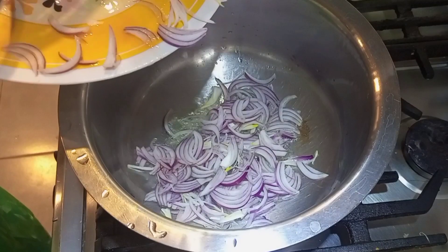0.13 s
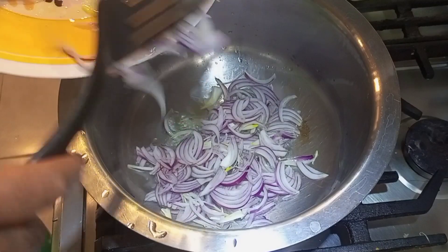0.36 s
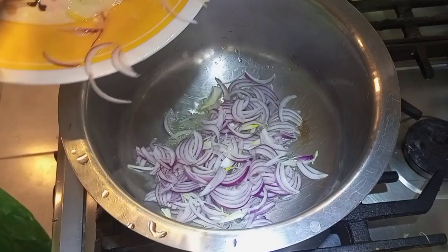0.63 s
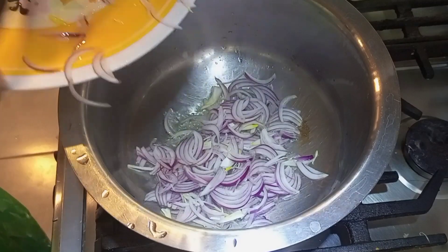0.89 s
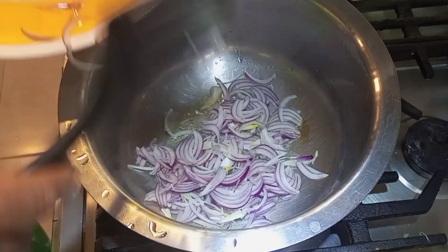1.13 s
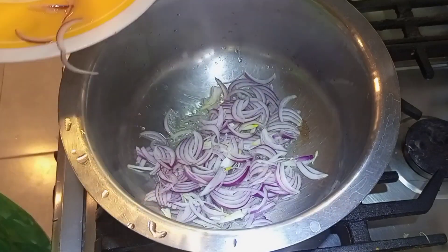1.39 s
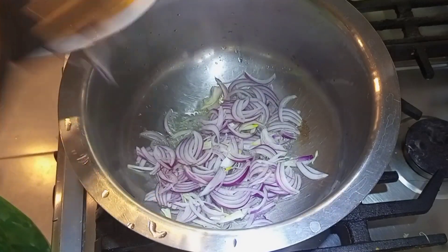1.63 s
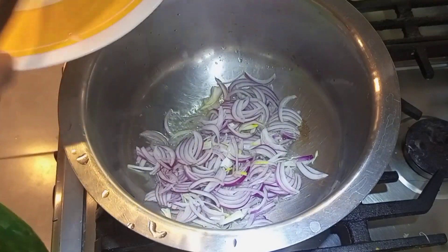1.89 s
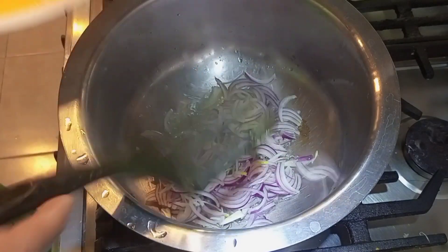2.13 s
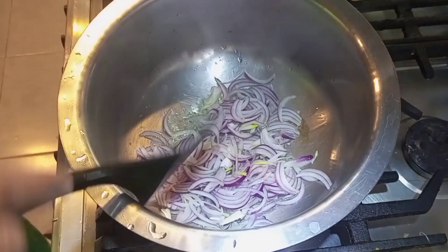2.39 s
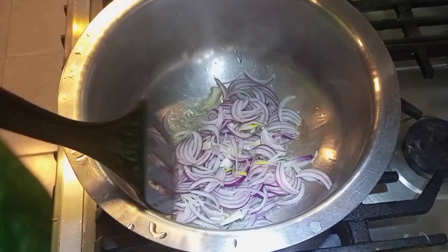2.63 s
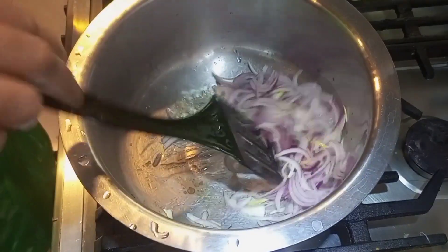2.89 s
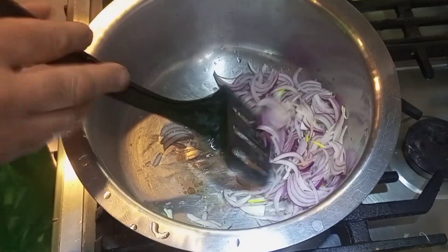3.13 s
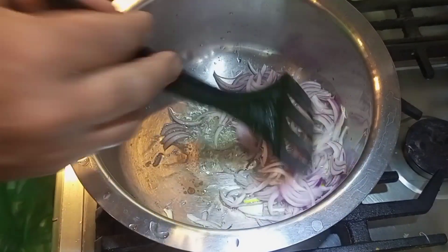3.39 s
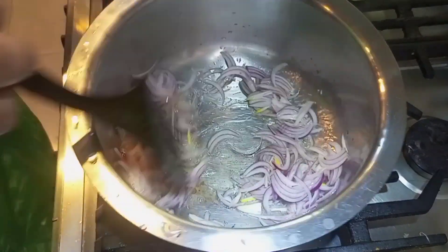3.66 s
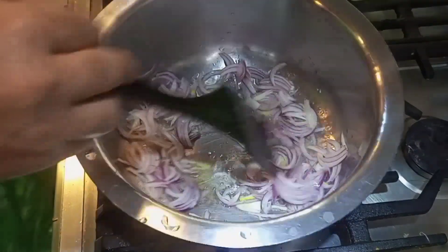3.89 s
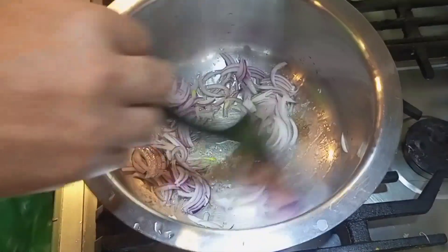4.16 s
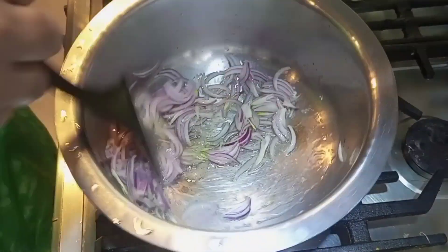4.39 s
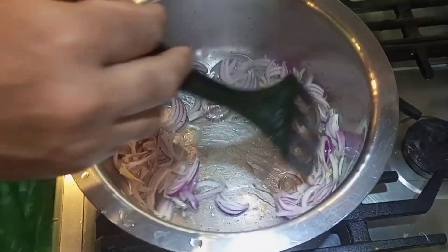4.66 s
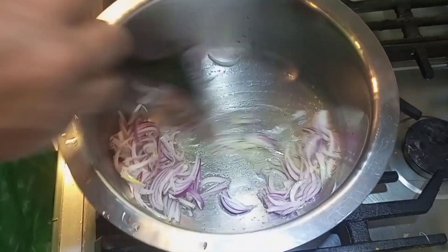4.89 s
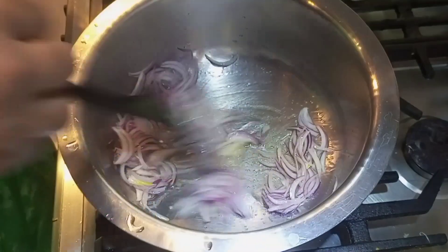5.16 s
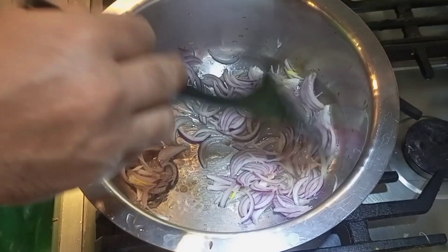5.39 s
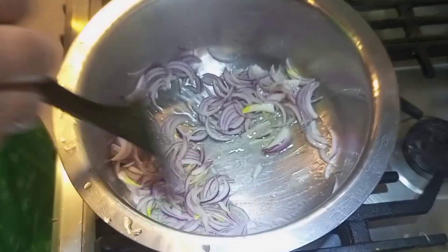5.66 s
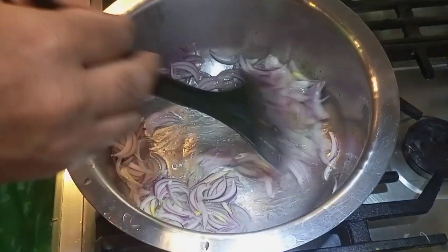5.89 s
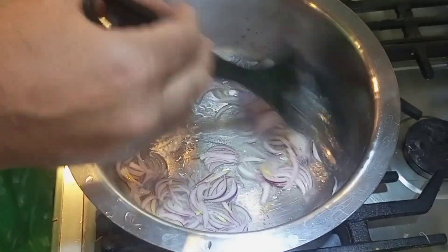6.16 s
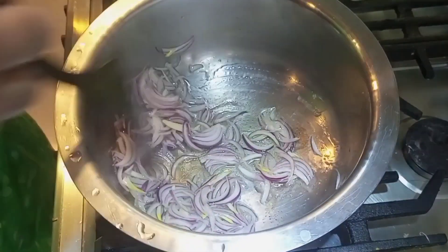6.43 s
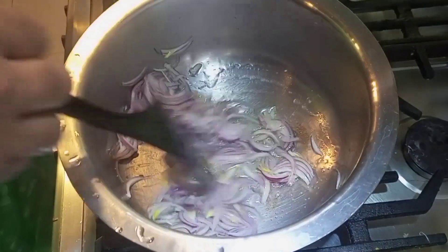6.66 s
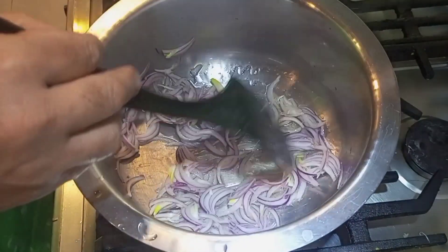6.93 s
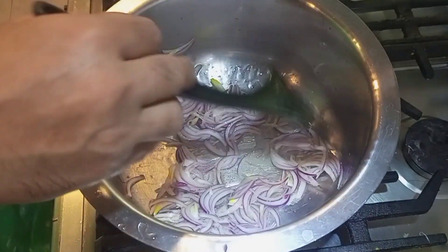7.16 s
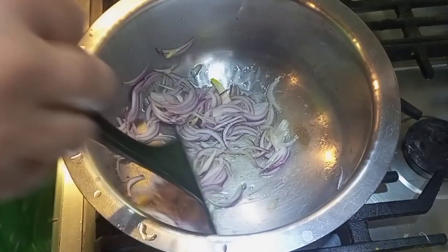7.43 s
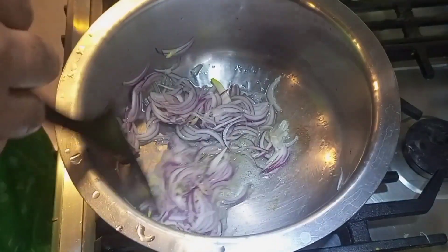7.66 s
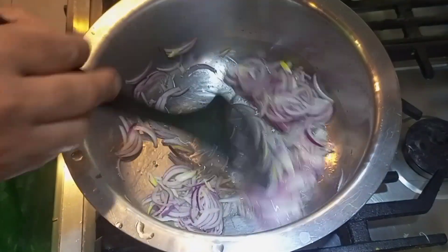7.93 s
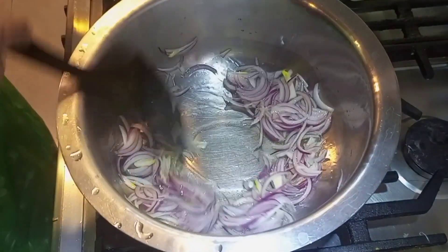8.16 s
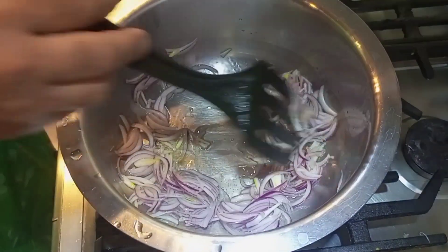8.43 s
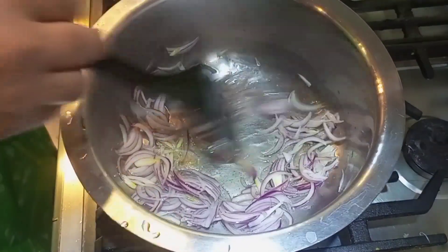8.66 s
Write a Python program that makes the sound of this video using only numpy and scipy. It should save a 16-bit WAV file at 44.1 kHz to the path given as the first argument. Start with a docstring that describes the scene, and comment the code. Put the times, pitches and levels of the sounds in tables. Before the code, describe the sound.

Over a low fan hum, three knocks on a plate and a ringing pot clank lead into spatula strokes through onions frying with swelling sizzle.

```python
"""A small tiled kitchen: sliced onions sizzle and spit in hot oil in a steel pot, under an extractor fan's hum.
A plastic spatula knocks three times on a plate, with one faint tap between, and clanks on the pot's rim.
Then it stirs: it rumbles over the bottom and makes the steel walls sing. Fan and frying are sines and shaped
noise; spits and blows are fading sines and noise bursts; knocks and strokes are shocks through resonances.
The room answers with noise that dies at its own speed in each band; one microphone hears it all."""
import sys
import numpy as np
from scipy import signal
from scipy.fft import rfft, irfft, next_fast_len
from scipy.io import wavfile
from scipy.ndimage import uniform_filter1d, minimum_filter1d, map_coordinates

SR = 44100
rng = np.random.default_rng(int(sys.argv[2]) if len(sys.argv) > 2 else 0)


def level_to_linear(level):
    """Convert decibel levels to linear amplitude factors, elementwise."""
    exponent = np.asarray(level, float) / 20
    return 10 ** exponent


def wav_record(signal):
    """Record a signal, one row per channel, as 16-bit PCM in the file named by sys.argv[1]."""
    frames = np.transpose(np.atleast_2d(signal))
    bounded = np.clip(frames, -1, 1)
    # unit amplitude maps onto the largest positive 16-bit level
    quanta = np.round(bounded * 32767).astype(np.int16)
    wavfile.write(sys.argv[1], SR, quanta)


N = 388080
HZ = np.fft.rfftfreq(next_fast_len(N + SR), 1 / SR)  # grid for whole-scene filters, a second of room for tails

# fan blade tones before their unsteadiness: (frequency [Hz], rms level [dB])
FAN_TONES = [(91.5, -67), (183.0, -65.5), (274.5, -81.5), (366.1, -83.5)]
# spectrum of the fan's air noise: (frequency [Hz], relative density [dB per Hz])
AIR_COLOUR = [(15, -64), (55, -21), (82, -3), (134, -6), (182, -15), (236, -16.5), (277, -12.5),
              (939, -13.5), (3000, -31), (3900, -66), (6600, -120)]
# fizz before its flutter, and coarse crackle, which also carries the rattle after the clank:
# (time [s], fizz level [dB], coarse crackle level [dB])
FIZZ_AND_CRACKLE = [(0, -57.5, -77.5), (.55, -57, -65), (1.6, -61, -65), (2.17, -61, -67.5),
                    (2.35, -59, -49), (2.7, -63, -62.5), (3.05, -55, -59.5), (3.7, -49.5, -54),
                    (4.75, -48.5, -64.5), (5.1, -54, -66.5), (5.4, -52, -67), (5.85, -47, -54.5),
                    (6.35, -51.5, -63), (7.0, -52.5, -75), (7.9, -58, -64.5), (8.3, -52, -60),
                    (8.8, -55, -67)]
# spectrum of the fizz: (frequency [Hz], relative density [dB per Hz])
FIZZ_COLOUR = [(1500, -12.5), (2500, -7), (4000, -2.5), (6500, 3), (9200, 6.5), (10500, 2.5), (11200, -5),
               (13500, -9.5), (14300, -3), (15500, 5), (15750, -35)]
# modes of the steel pot, ringing freely: (frequency [Hz], level [dB], t60 [s])
POT_MODES = [(372, -11, .9), (554, -7, .28), (889, -12.5, 1.2), (1151, -12, 2.4), (1169, -18, 3.5),
             (1252, -19, 2.0), (1880, -16, .4), (2004, -3, .35), (2112, -12, .35), (2170, -9, .35),
             (2349, -6, .85), (2380, -6, .7), (2607, -9, .5), (2810, -14, .5), (4150, -11, .25),
             (4871, -6, .25), (4987, -2, .28), (5834, -10, .2), (6445, -7, .18), (6561, -1, .23)]
# resonances of the pot's bottom under the spatula: (frequency [Hz], width [Hz], level [dB])
BOTTOM_RESONANCES = [(278, 24, 1), (378.3, 7.2, 3.5), (491, 76, 2), (848, 108, 1), (1308, 85, -4.5),
                     (1715, 25, 2), (2120, 30, -7.5), (2570, 63, -3.5), (2955, 40, -8)]
# strokes over the bottom: (time [s], length [s], scrape level [dB], scrape centre [Hz], rumble level [dB])
STROKES = [(2.238, 0.3, -55, 1010, -50.5), (2.422, 0.1, -46, 2710, -84), (2.882, 0.14, -53, 3530, -62),
           (3.567, 0.078, -58, 2700, -72), (3.748, 0.17, -49.5, 970, -48.5),
           (3.985, 0.13, -55.5, 800, -49.5), (4.119, 0.2, -56.5, 740, -58), (4.324, 0.14, -54, 1050, -51.5),
           (4.495, 0.074, -58, 800, -67), (4.942, 0.21, -63, 1000, -59), (5.656, 0.23, -56, 1080, -52),
           (5.865, 0.084, -55.5, 4740, -86), (6.27, 0.12, -65.5, 1010, -80), (6.745, 0.17, -63.5, 850, -55),
           (7.848, 0.14, -63, 855, -65.5), (8.158, 0.049, -58, 1930, -85),
           (8.753, 0.098, -58.5, 1000, -61.5)]
# short narrow bands of hiss that open and fade: (time [s], length [s], level [dB], centre [Hz])
NARROW_BANDS = [(0.549, 0.027, -55.5, 6200), (1.043, 0.084, -60, 5380), (1.669, 0.11, -59.5, 4950),
                (2.023, 0.0174, -47, 4460), (2.427, 0.047, -45.5, 4490), (2.62, 0.051, -54, 4580),
                (2.669, 0.16, -60.5, 386), (2.899, 0.24, -57, 5850), (3.2, 0.15, -60, 5700),
                (3.3, 0.038, -56.5, 1966), (3.326, 0.14, -58.5, 4870), (3.485, 0.04, -53, 5400),
                (3.606, 0.037, -51, 5500), (3.63, 0.094, -60, 2830), (3.745, 0.069, -60, 2120),
                (3.992, 0.051, -61.5, 1380), (4.108, 0.054, -58, 1360), (4.332, 0.082, -61, 2120),
                (4.373, 0.1, -59, 800), (4.565, 0.064, -51.5, 5900), (4.894, 0.016, -55.5, 2400),
                (5.064, 0.055, -67, 2120), (5.063, 0.029, -69, 1310), (5.423, 0.034, -53.5, 5840),
                (5.442, 0.046, -69.5, 1660), (5.664, 0.039, -63, 1715), (5.698, 0.14, -52.5, 5940),
                (6.805, 0.11, -69, 1370), (6.057, 0.07, -60, 4930), (6.325, 0.071, -67.5, 795),
                (7.869, 0.05, -77, 1715), (7.962, 0.053, -67.5, 1715), (8.33, 0.045, -65.5, 1715),
                (8.059, 0.034, -60.5, 6500), (8.154, 0.14, -62.5, 4620), (8.166, 0.085, -64, 1150),
                (8.242, 0.095, -56, 5980), (8.42, 0.037, -52, 5800)]
# decay of the kitchen's answer: (frequency [Hz], t60 [s])
KITCHEN_DECAY = [(300, 0.84), (620, 0.25), (1000, 0.44), (4000, 0.35), (10000, 0.11)]
# knocks on the plate; a harder contact has a higher centre: (time [s], force [dB], centre [Hz])
KNOCKS = [(0.7952, 2.5, 840), (1.4828, 7, 1100), (1.583, -15, 3470), (1.9333, 3, 2480)]
# resonances of the plate: (frequency [Hz], width [Hz], level [dB])
PLATE_RESONANCES = [(620.6, 8, 11.5), (724, 244, 6.5), (961, 19, 3.5), (1440, 900, -4.5), (1715, 9.7, -1),
                    (2600, 100, 2.5), (3026, 74, 4.5), (3570, 580, 0.5), (4850, 9800, -7.5),
                    (6020, 120, 11)]
# spitting drops: (time [s], level before ring/click mix [dB], pitch [Hz])
SPITS = [(1.3329, -39.5, 4700), (1.399, -42, 8300), (1.671, -32, 6050), (1.826, -40.5, 8150),
         (1.9007, -38.5, 6300), (2.195, -41, 5860), (2.368, -36, 7400), (2.4512, -33, 4700),
         (2.5004, -18.5, 14000), (2.786, -40, 2650), (2.8504, -24.5, 4360), (2.894, -27, 6270),
         (3.314, -33, 7440), (3.492, -29.5, 6160), (3.704, -35, 6250), (3.9477, -28, 7100),
         (4.1036, -28, 9100), (5.8102, -35, 8930), (5.9528, -28, 6150), (8.0594, -40, 6740),
         (8.4486, -41, 5590)]
# blows on the pot's rim and wall:
# (time [s], ringing level [dB], lowest [Hz], highest [Hz], how long the clang rings freely before it is cut short [s])
BLOWS = [(2.2199, -32.5, 410, 8200, 0.695), (7.223, -47.5, 424, 1320, 0.024)]


def unit(x):
    """Scaled to rms 1."""
    return x / np.sqrt(np.mean(x ** 2) + 1e-20)


def along(points, hz):
    """Reads a (Hz, value) curve on a log frequency axis."""
    f, v = np.transpose(points)
    return np.interp(np.log(hz + 1), np.log(f + 1), v)


def curves(rows):
    """One gain per sample for each dB column; -120 dB ahead of the table."""
    s, *cols = np.transpose(rows)
    return [level_to_linear(np.interp(np.arange(N) / SR, s, c, left=-120)) for c in cols]


def wobble(rate):
    """A smooth random curve, rate knots a second."""
    knots = rng.standard_normal(int(N * rate / SR) + 4)
    return map_coordinates(knots, [np.arange(N) * rate / SR])


def filtered(x, response):
    """x times a response given on the grid HZ."""
    m = next_fast_len(N + SR)
    return irfft(rfft(x, m) * response, m)[:N]


def resonances(peaks):
    """Causal response of (Hz, width in Hz, dB) peaks, with alternating signs."""
    total = 0
    for k, (centre, width, db) in enumerate(peaks):
        loss = 1j * HZ * width
        total = total + (-1) ** k * level_to_linear(db) * loss / (centre * centre - HZ ** 2 + loss)
    return total


def band(lo_hz, hi_hz):
    """A steep band-pass."""
    return 1 / (1 + (lo_hz / (HZ + 1)) ** 8) / (1 + (HZ / hi_hz) ** 8)


def grains(rate, spread_db):
    """Random clicks, rate a second, of log-normal size with an upper limit."""
    chance = rng.random((2, N))
    size = np.minimum(rng.standard_normal(N), 2)
    return unit((chance[0] < rate / SR) * np.sign(chance[1] - .5) * level_to_linear(spread_db * size))


def patchy(x, depth_db, bins=4, frames=10):
    """Random regions of pitch and time swell and fade."""
    z = signal.stft(x, nperseg=256)[2]
    field = uniform_filter1d(rng.standard_normal(z.shape), bins, 0)
    field = uniform_filter1d(field, frames, 1)
    return unit(signal.istft(z * level_to_linear(depth_db * unit(field)), nperseg=256)[1][:N])


def fan():
    """Slightly unsteady blade tones over air noise."""
    turn = np.cumsum(1 + 0.00432 * wobble(4.0)) / SR  # seconds, at a drifting speed
    tones = 0
    for (hz, db), swing_db in zip(FAN_TONES, [2.5, 1.7, 2.8, 4.7]):
        level = np.sqrt(2) * level_to_linear(db + swing_db * wobble(18))
        tones = tones + level * np.sin(2 * np.pi * (hz * turn + rng.random()))
    air = filtered(rng.standard_normal(N), level_to_linear(along(AIR_COLOUR, HZ)))
    return tones + level_to_linear(-71.5) * patchy(air, depth_db=-1.5)


def damped_pot():
    """Onions and oil widen the modes of pot and bottom."""
    walls = resonances([(hz, 50, db / 2) for hz, db, t60 in POT_MODES])
    return resonances(BOTTOM_RESONANCES) + 0.42 * walls


def ticking_hisses(count):
    """Randomly placed narrow hisses, each with a tick, near detuned upper modes of the pot."""
    out, t = np.zeros(N + SR), np.arange(SR // 8) / SR
    modes_hz = [row[0] for row in POT_MODES + BOTTOM_RESONANCES if row[0] > 4000]
    for when, which, detune, life, size in rng.random((count, 5)):
        noise = rng.standard_normal((2, len(t)))
        pitch_hz = modes_hz[int(which * len(modes_hz))] * 2 ** (0.51 * (detune - .5))
        # slow noise times a sine: a narrow band around the pitch
        hiss = unit(uniform_filter1d(noise[0], size=700)) * np.sin(2 * np.pi * pitch_hz * t)
        fade = level_to_linear(-10 * (t / (.025 + .08 * life)) ** 2)
        tick = 0.73 * size * np.diff(noise[1] * level_to_linear(-60 * t / 0.0027), prepend=0)
        out[round(when * N):][:len(t)] += level_to_linear(6 * size) * (hiss * fade + tick)
    return filtered(out[:N], band(1400, 12000))


def frying():
    """Steam bubbles burst in the oil: fizz, with coarse crackle coloured by the pot and narrow hisses on top.
    The coarse crackle also carries the rattle after the clank."""
    fizz_level, coarse_level = curves(FIZZ_AND_CRACKLE)
    fine_crackle = 0.5 * grains(rate=600, spread_db=12.5)
    fizz = filtered(rng.standard_normal(N) + fine_crackle, level_to_linear(along(FIZZ_COLOUR, HZ)))
    fizz = patchy(fizz, depth_db=2.5)
    flutter = level_to_linear(0.33 * wobble(26.0) + 0.83 * wobble(25))
    coarse = filtered(grains(rate=1600, spread_db=12.5), (damped_pot() + 0.17) * band(1730, 10900))
    coarse = patchy(coarse, depth_db=4, bins=1, frames=18)
    coarse = level_to_linear(-3) * coarse + level_to_linear(-3) * ticking_hisses(count=450)
    return fizz_level * flutter * fizz + coarse_level * coarse


def stirring():
    """The blade's edge sticks and slips: small shocks drive the resonances near each stroke's centre.
    A stroke lands with a scrape that sags while the bottom's rumble swells with the pressure.
    The same shocks, filtered narrowly, give short bands of hiss that open and fade."""
    fade_t60_s, attack_s = 0.098, .0015
    slips = grains(rate=700, spread_db=6) * level_to_linear(1.5 * wobble(45))
    # a larger shock at each onset, added to slips that have rms 1 before their wobble
    slips[[round(row[0] * SR) + 30 for row in STROKES + NARROW_BANDS]] += 7.8
    shaken = patchy(filtered(slips, damped_pot() + 0.06), depth_db=2.5, bins=1, frames=20)
    shaken = np.pad(shaken, (0, SR))
    out = np.zeros(N + SR)

    def add(s, length, db, centre_hz, octaves, sag_db, rise_s, rasp=0):
        """One band of the shaken sound: it rises, sags, then dies away."""
        t = np.arange(next_fast_len(round((length + fade_t60_s) * SR))) / SR
        hz = np.fft.rfftfreq(len(t), 1 / SR) + 1
        part = shaken[round(s * SR):][:len(t)]
        reach = np.exp(-abs(np.log2(hz / centre_hz) / octaves) ** 1.5)
        reach = np.maximum(reach, rasp * (hz > centre_hz) * (hz < 3500))  # rasp: a floor above the centre
        # each one favours its own close upper pitches
        own = uniform_filter1d(rng.standard_normal(len(hz)), size=1 + round(60 * len(t) / SR))
        reach *= level_to_linear(3 * unit(own) * (hz > 1500))
        part = unit(irfft(rfft(part) * reach, len(t)))
        shape_db = sag_db * (.5 - t / length) - 60 * np.maximum(t - length, 0) / fade_t60_s
        out[round(s * SR):][:len(t)] += level_to_linear(db + shape_db) * np.minimum(t / rise_s, 1) * part

    for s, length, scrape_db, centre_hz, rumble_db in STROKES:
        add(s, length, scrape_db, centre_hz, octaves=0.61, sag_db=4.5, rise_s=attack_s, rasp=0.27)
        add(s, length, rumble_db, centre_hz=339, octaves=0.67, sag_db=4.5, rise_s=0.31 * length)
    for s, length, db, centre_hz in NARROW_BANDS:
        add(s, length, db, centre_hz, octaves=0.12, sag_db=0.5, rise_s=attack_s)
    return out[:N]


def kitchen(x):
    """Each frequency of the room's answer dies at its own speed."""
    hz, t, z = signal.stft(rng.standard_normal(SR // 2), SR, nperseg=256)
    fade = level_to_linear(-60 * t / along(KITCHEN_DECAY, hz)[:, None])
    tail = signal.istft(z * fade, SR, nperseg=256)[1]
    tail = np.pad(tail / np.linalg.norm(tail), (150, 0))  # the answer comes 150 samples late
    return signal.fftconvolve(x, tail)[:N]


def patchy_room(x):
    """The room answers some pitches more strongly than their neighbours."""
    uneven_db = 2.5 * unit(uniform_filter1d(rng.standard_normal(len(HZ)), size=1500))
    return filtered(kitchen(x), level_to_linear(uneven_db))


def plate():
    """Each knock lands as a brief rattle of contacts and rings the plate with its own brightness; worktop and
    wall echo it, then the room."""
    below_db, above_db = 4.5, 7  # weakening away from the knock's centre, dB per octave
    out = np.zeros(N)
    for s, db, centre_hz in KNOCKS:
        blow = np.zeros(N)
        times = s + np.array([0, .0014, .0031, .009])  # the first contact, two quick further contacts, and a later echo
        blow[np.round(times * SR).astype(int)] = level_to_linear(db) * np.array([1, .8, .55, -.5])
        octaves = np.log2((HZ + 1) / centre_hz)
        slope_db = np.minimum(below_db * octaves, -above_db * octaves)
        direct = filtered(blow, resonances(PLATE_RESONANCES) * level_to_linear(slope_db) * band(540, 13500))
        started = np.arange(N) > (s - .002) * SR
        out += (direct + level_to_linear(-4) * patchy_room(direct)) * started
    return out


def spitting():
    """A drop bursts: a ring that fades 60 dB in 36 cycles of its pitch, and a bright click."""
    out, t = np.zeros(N + SR), np.arange(SR // 20) / SR
    for s, db, hz in SPITS:
        ring = np.sin(2 * np.pi * hz * t) * level_to_linear(-60 * t * hz / 36)
        ring *= np.minimum(t * hz / 2, 1)  # rises over two cycles
        click = np.diff(np.sign(rng.standard_normal(len(t))) * level_to_linear(-60 * t / 0.0014), prepend=0)
        out[round(s * SR):][:len(t)] += level_to_linear(db) * (1.1 * ring + 0.33 * click)
    return filtered(out[:N], band(1800, 14000))


def pot_blows():
    """A blow rings the modes within its reach, unsteadily, over a crack and the clatter of the shaken walls;
    after ringing freely for a while the clang is cut short."""
    cut_t60_s = .4
    out, t, damped = np.zeros(N), np.arange(SR) / SR, damped_pot()
    for s, db, lo_hz, hi_hz, free_s in BLOWS:
        cut = level_to_linear(-60 * np.maximum(t - free_s, 0) / cut_t60_s)
        clang, shake = np.zeros((2, N + SR))
        ring = 0
        for hz, level, t60 in POT_MODES:
            level_db = level + 2.5 * wobble(20)[:SR] - 60 * t / t60
            ring = ring + level_to_linear(level_db) * np.sin(2 * np.pi * hz * t)
        crack = 7 * level_to_linear(-60 * t / 0.04) * rng.standard_normal(len(t))
        clatter = level_to_linear(db - 3 - 60 * t / 2.5) * cut * rng.standard_normal(len(t))
        clang[round(s * SR):][:len(t)] = level_to_linear(db) * (ring + crack) * cut
        shake[round(s * SR):][:len(t)] = clatter
        out += filtered(clang[:N], band(lo_hz, hi_hz))
        out += filtered(shake[:N], (damped + 0.33) * band(2 * lo_hz, hi_hz))
    return out


def scene():
    """All sources meet at one microphone, sent alike to two channels."""
    near, stir = pot_blows() + spitting(), stirring()
    room = kitchen(level_to_linear(-6.5) * near + level_to_linear(-13.0) * stir)
    mono = near + stir + room + plate() + frying() + fan()
    return np.array([mono, mono])


def suppressor(x, depth_db, margin_db, memory_s, hold):
    """A band passes fully while it stands above its own recent level, and is turned down otherwise."""
    hz, t, z = signal.stft(x, SR, nperseg=256, noverlap=128)
    power = uniform_filter1d(abs(z) ** 2, size=3, axis=1)  # over neighbouring bands
    power = uniform_filter1d(power, size=5, axis=2)  # over neighbouring frames
    level_db = 10 * np.log10(abs(power) + 1e-20)
    keep = np.exp(-t[1] / memory_s)
    start_db = level_db[..., 20:21]
    recent_db = signal.lfilter([1 - keep], [1, -keep], level_db - start_db, axis=2) + start_db
    excess = np.clip((level_db - recent_db - margin_db) / 0.076, -30, 30)
    closed = 1 / (1 + np.exp(excess) / 3)
    closed = minimum_filter1d(closed, hold, axis=2, origin=(hold - 1) // 2)  # once open, it stays for hold frames
    gain = level_to_linear(-depth_db * closed * (hz > 300)[:, None])
    return signal.istft(z * gain, SR, nperseg=256, noverlap=128)[1][:, :N]


def band_limit(x):
    """A steep low-pass at the top of the band."""
    return signal.sosfilt(signal.butter(12, 16800, fs=SR, output="sos"), x)


def record(dry):
    """The recorder turns steady noise down a little."""
    mix = suppressor(dry, depth_db=2.5, margin_db=9.0, memory_s=0.19, hold=13)
    return band_limit(mix)


dry = scene()
out = record(dry)
wav_record(out)
```